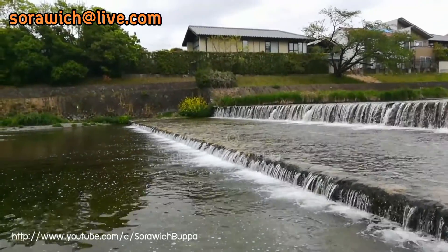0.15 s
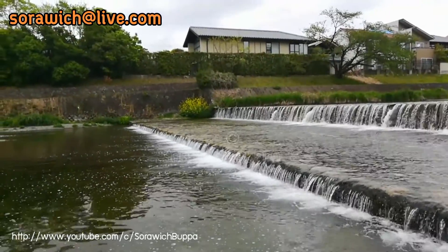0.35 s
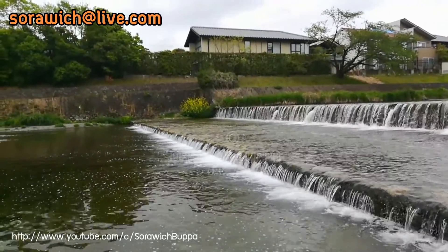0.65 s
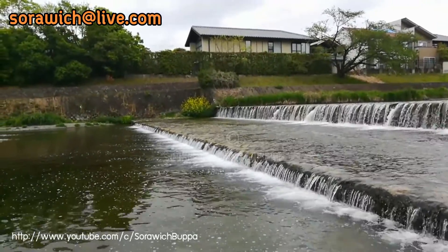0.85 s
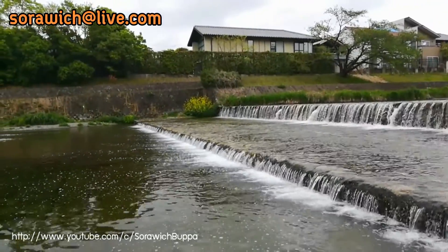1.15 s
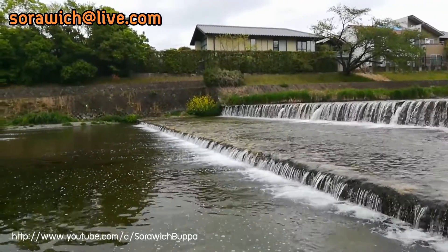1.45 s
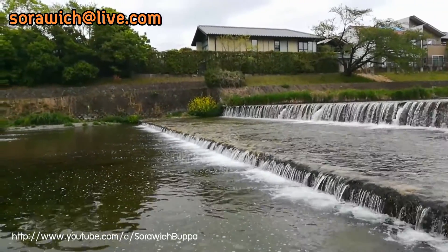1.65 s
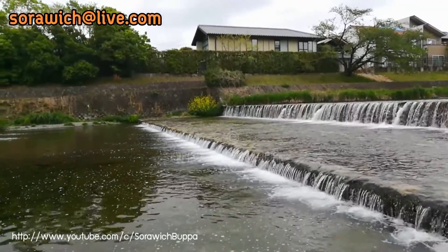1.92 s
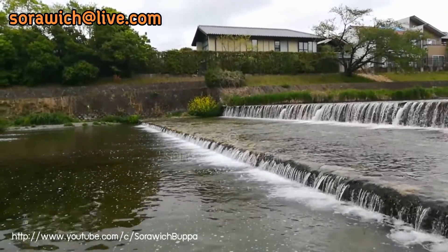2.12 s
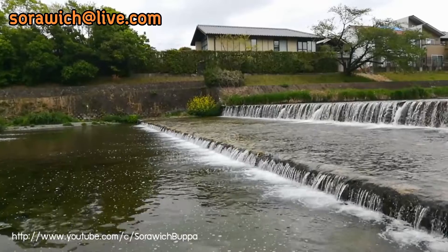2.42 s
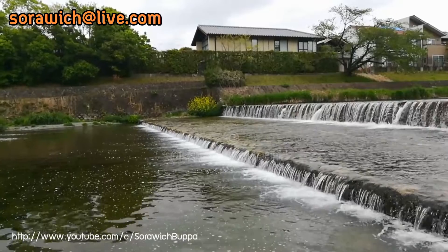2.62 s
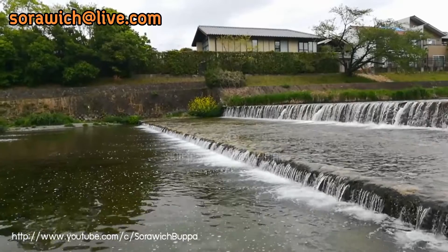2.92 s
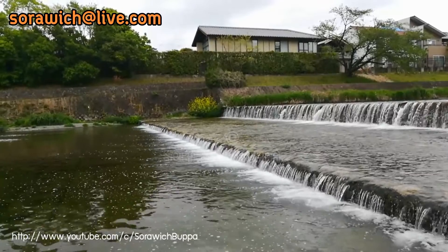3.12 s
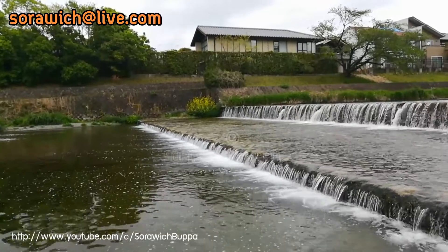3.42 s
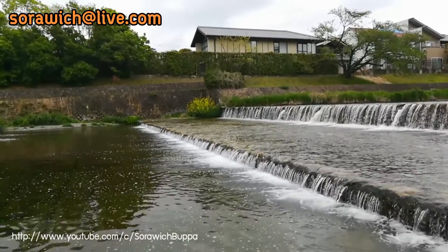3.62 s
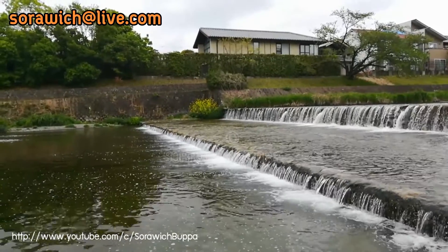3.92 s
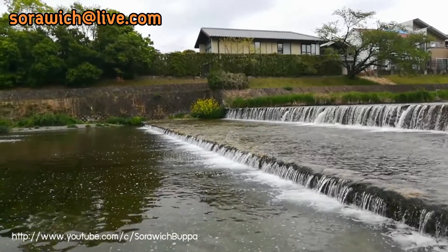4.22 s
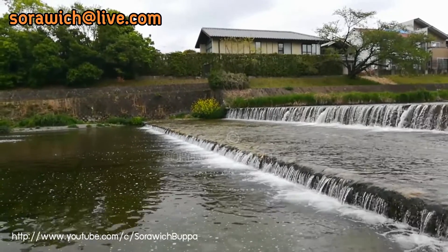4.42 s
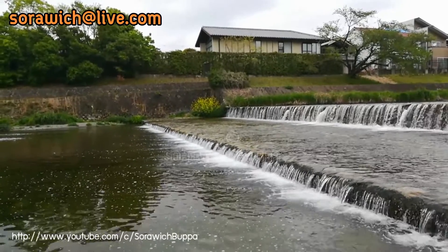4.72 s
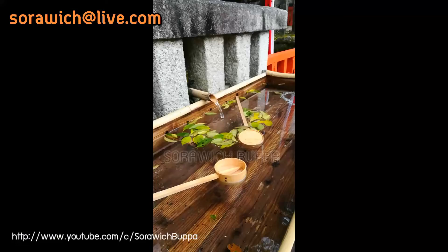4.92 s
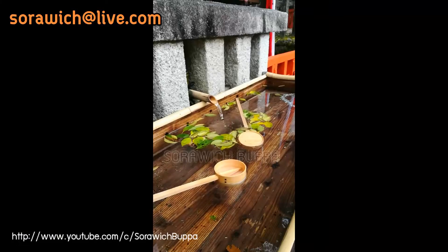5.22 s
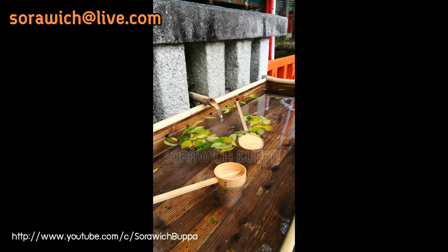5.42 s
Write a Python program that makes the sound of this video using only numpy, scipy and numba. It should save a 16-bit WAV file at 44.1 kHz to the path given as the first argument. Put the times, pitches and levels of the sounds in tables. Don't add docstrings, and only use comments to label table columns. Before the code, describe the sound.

A loud, wide wash of falling river water fills nearly five seconds, strongest wind rumble around two seconds, occasional bubbles glugging through. The right side turns slightly hollow late as a finger nears the microphone. An abrupt cut leaves a brief gap, then a thin, faint spout trickle and delicate drips rise in a quiet yard.

```python
import sys
import numpy as np
from scipy import signal
from scipy.fft import rfft, irfft
from scipy.io import wavfile
from scipy.ndimage import uniform_filter1d
from numba import njit

SR = 44100
rng = np.random.default_rng(int(sys.argv[2]) if len(sys.argv) > 2 else 0)


def natural_amplitude(level_db):
    exponent = np.asarray(level_db, float) / 20
    return 10 ** exponent


def bounce(signal):
    frames = np.transpose(np.atleast_2d(signal))
    limited = np.clip(frames, -1, 1)
    pcm = np.round(limited * 32767).astype(np.int16)
    wavfile.write(sys.argv[1], SR, pcm)


N = 244735
T = np.arange(N) / SR


@njit
def ring(at, hz, cycles, glide, size):
    out = np.zeros(N)
    for k in range(len(at)):
        start = int(at[k])
        span = cycles[k] * SR / hz[k]
        turn = 2j * np.pi * hz[k] / SR
        z = size[k] + 0j
        step = np.exp(turn - 2 / span)
        rise = np.exp(turn * glide / span)
        for i in range(start, min(N, int(at[k] + 3 * span))):
            z *= step
            step *= rise
            out[i] += z.imag * min(1., 5 * (i - start) / span)
    return out


def bubble_cloud(per_s, low_hz, high_hz, cycles, spread_db, glide):
    when, pitch, life, rank = rng.random((int(per_s * N / SR), 4)).T
    hz = low_hz * (high_hz / low_hz) ** np.sqrt(pitch)
    size = natural_amplitude(-spread_db * np.log(1 - 0.99 * rank))
    spectrum = rfft(ring(when * N, hz, cycles * (0.5 + life), glide, size))
    power = uniform_filter1d(np.abs(spectrum) ** 2, size=1500)
    flat = irfft(spectrum / np.sqrt(power + 1e-9), N)
    return flat / flat.std()


def near_and_far(bubbles, near_share):
    return np.sqrt(near_share) * bubbles + np.sqrt(1 - near_share) * rng.standard_normal(N)


def at_ports(water, left, right, ports, flicker_db, modes=(), gusts=()):
    # f/Hz, share/0-1, calm level/dB
    gust_reach = [(35, 0.95, -9), (70, 0.87, -6.5), (120, 0.2, -3.5), (190, 0.15, -2.5), (320, 0.03, -2.5),
                  (1100, 0.02, -.7), (7000, 0, -.3)]
    frame = dict(nperseg=2048, noverlap=1536)
    hz, s, (shared, *own) = signal.stft(water, SR, **frame)
    octave = np.log2(hz + 1)

    def along(rows, column):
        rows = np.array(rows)
        return np.interp(octave, np.log2(rows[:, 0]), rows[:, column])[:, None]

    patches = uniform_filter1d(rng.standard_normal((48, len(s))), size=5, axis=1)
    patches = uniform_filter1d(patches, size=2, axis=0)
    swell_db = flicker_db * patches[(3 * octave).astype(int)] / patches.std()
    for f, width, db in modes:
        swell_db += db / (1 + (2 * (hz[:, None] - f) / width) ** 2)
    if len(gusts):
        gust_db = sum(db * np.exp(-((s - at) / half) ** 2) for at, half, db in gusts)
        swell_db += along(gust_reach, 2) + along(gust_reach, 1) * gust_db
    swell_db[0] = -np.inf

    likeness = np.clip(along(ports, 1), 0, 1)
    lag = along(ports, 2)
    out = []
    for colour, mine, side in zip((left, right), own, (-1, 1)):
        common = np.sqrt(likeness) * shared * np.exp(side * 0.5j * lag)
        private = np.sqrt(1 - likeness) * mine
        out.append(natural_amplitude(along(colour, 1) + swell_db) * (common + private))
    return signal.istft(np.array(out), SR, **frame)[1][:, :N] * np.sqrt(SR / 2)


def single_bubbles(rows, cycles, glide, gain_db):
    s, db, hz, pan_db = np.transpose(rows)
    sides = [natural_amplitude(db + gain_db + side * pan_db / 2) for side in (1, -1)]
    return np.array([ring(s * SR, hz, cycles + 0 * s, glide, size) for size in sides])


def finger_by_port(roar):
    notch_hz = 3350
    small_hz = 1500
    skin_hz = 9300
    hz = np.fft.rfftfreq(N, 1 / SR)
    delay = np.exp(-2j * np.pi * hz / notch_hz)
    reflected = hz ** 2 / (hz ** 2 + small_hz ** 2) / (1 + (hz / skin_hz) ** 10)
    echo = irfft(rfft(roar[1]) * delay * reflected, N)
    share = np.interp(T, [3.45, 4.4], [0, 0.4])
    return np.array([roar[0], (roar[1] - share * echo) / np.sqrt(1 + 0.5 * share ** 2)])


def weirs():
    # f/Hz, level/dB per Hz
    weir_left = [(25, -59), (44, -57.5), (83, -56.5), (159, -53), (273, -61), (420, -59.5), (620, -64),
                 (930, -63.5), (1250, -59), (2150, -65), (5670, -64.5), (9930, -72), (13000, -78.5),
                 (15700, -72)]
    weir_right = [(25, -59), (60, -57), (156, -53), (300, -62.5), (430, -58), (850, -59.5), (1230, -60.5),
                  (2060, -67.5), (2790, -69), (4380, -65), (6500, -63.5), (8540, -58.5), (10820, -58),
                  (15700, -71.5)]
    # f/Hz, coherence/0-1, left lag/rad
    weir_ports = [(130, .975, .12), (230, .95, .3), (400, .8, 1.3), (620, .78, 2.2), (800, .42, 1.2),
                  (1200, .68, .8), (1450, .15, .8), (1750, .35, 2.6), (1950, .1, 0), (2500, .33, -2.5),
                  (3000, .36, -5), (3400, .33, -6.3), (4000, .1, -8.5), (9000, .05, -27)]
    # f/Hz, width/Hz, level/dB
    bank = [(175, 54, 2.5), (634, 140, -2.5), (830, 170, 3), (1005, 120, -1.5), (1233, 120, 2),
            (1390, 99, -4), (1580, 210, 3), (1780, 68, -4.5), (1910, 120, 2), (2020, 140, -2),
            (2400, 360, 0)]
    # t/s at the height, half length/s, level/dB over calm
    gusts = [
        (.25, .3, 0),
        (1.3, 0.15, 10),
        (2.08, .28, 16.5),
        (2.55, 0.18, 7),
        (2.95, 0.12, 9),
        (3.63, .13, 8.5),
        (4.05, 0.27, 5),
        (4.45, .35, 8.5),
    ]
    # t/s, peak level/dB, f/Hz, left minus right/dB
    glugs = [(0.223, -15, 1130, -4), (0.486, -16, 1230, -2), (1.95, -21, 1150, -3.5),
             (2.215, -25, 1230, 0.5), (2.271, -18, 870, 5), (2.403, -19, 1020, -4), (2.429, -17, 1230, -8),
             (2.487, -16, 1180, -3), (2.841, -10, 1120, 3.5), (3.334, -18, 1080, 10), (4.38, -24, 1270, -7)]
    water = []
    for _ in range(3):
        bubbles = bubble_cloud(9000, 201.5, 16330, cycles=10.24, spread_db=2.5, glide=0.193)
        water.append(near_and_far(bubbles, near_share=0.28))
    roar = at_ports(np.array(water), weir_left, weir_right, weir_ports, 0.36, modes=bank, gusts=gusts)
    roar += single_bubbles(glugs, cycles=9.8, glide=0.19, gain_db=-7.0)
    return finger_by_port(roar)


def splash():
    droplet_hz = [7670, 5900, 4500, 5200, 7670, 5900, 6600, 5400, 6600]
    return [(5.5035 + 0.001 * k, -35 - 1.1 * k, hz, -7) for k, hz in enumerate(droplet_hz)]


def basin():
    # f/Hz, level/dB per Hz
    basin_left = [(25, -68.5), (50, -70), (143, -76), (185, -79.5), (273, -79), (490, -89), (1010, -86.5),
                  (2350, -90), (5000, -87), (5800, -86), (7800, -86.5), (8400, -95), (14800, -102),
                  (15700, -108)]
    basin_right = [(25, -68), (67, -69.5), (185, -78.5), (291, -81), (440, -87), (1100, -84.5),
                   (1400, -85.5), (2200, -89), (5000, -85.5), (6300, -77), (7800, -78), (8400, -83.5),
                   (12000, -85.5), (15700, -92)]
    # f/Hz, coherence/0-1, left lag/rad
    basin_ports = [(60, .995, 0), (250, .92, 0), (450, .3, 2.5), (800, .2, 1), (1100, .45, 0),
                   (2000, .2, 0), (3500, .15, 1.5), (7700, .35, 3), (12000, .1, 1.5)]
    # f/Hz, width/Hz, level/dB over the hiss
    rings = [(280, 20, 0.5), (1020, 72, 5.5), (3900, 80, 6), (5610, 60, 2), (5950, 73, -9), (6290, 66, 1),
             (7670, 57, -2)]
    # t/s, peak level/dB, f/Hz, left minus right/dB
    drips = [
        (5.075, -51, 375, 0),
        (5.14, -52, 300, 0),
        (5.2, -51, 355, 0),
        (5.288, -40, 6300, -5),
        (5.35, -49, 1170, -3),
        (5.372, -49, 1170, -3),
        (5.355, -44, 280, 0),
        (5.41, -46, 1020, -3),
        (5.528, -39, 7670, -8),
    ]
    water = []
    for _ in range(3):
        bubbles = bubble_cloud(4000, 300, 15000, cycles=14., spread_db=2.5, glide=0.15)
        water.append(near_and_far(bubbles, near_share=0.2))
    trickle = at_ports(np.array(water), basin_left, basin_right, basin_ports, 0.4, modes=rings)
    drops = single_bubbles([*drips, *splash()], cycles=32., glide=0.02, gain_db=3)
    return natural_amplitude(1.5) * trickle + drops


def scene():
    cut_s, resume_s = 4.8425, 4.9735
    fade_from_s, fade_to_s = 4.962, 5.3
    fade = np.clip((T - fade_from_s) / (fade_to_s - fade_from_s), 0, 1)
    return weirs() * (T < cut_s) + basin() * fade * (T > resume_s)


def top_cut(x):
    return signal.sosfilt(signal.butter(12, 15820, fs=SR, output="sos"), x)


def record(dry):
    top_hz = 15780
    low_pass = signal.ellip(12, 0.3, 90, top_hz, fs=SR, output="sos")
    return top_cut(signal.sosfilt(low_pass, dry))


dry = scene()
out = record(dry)
bounce(out)
```